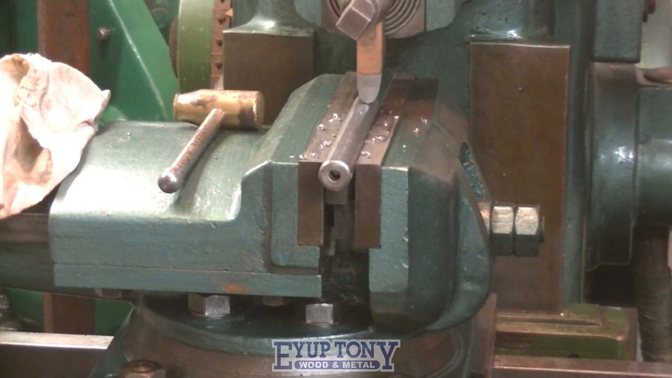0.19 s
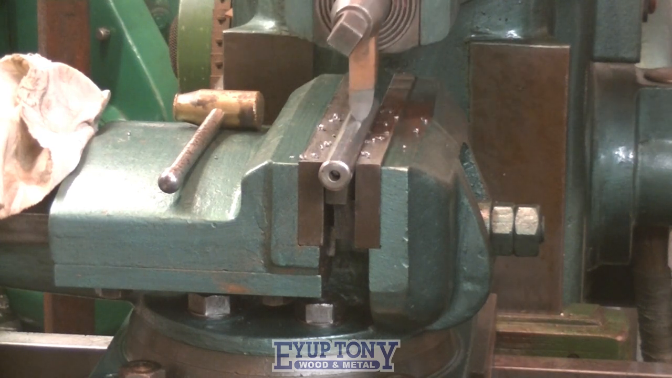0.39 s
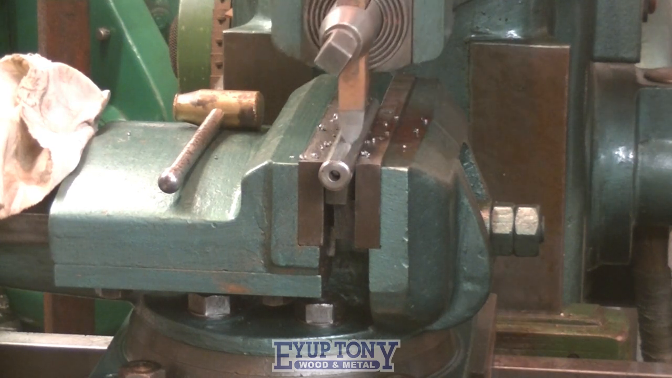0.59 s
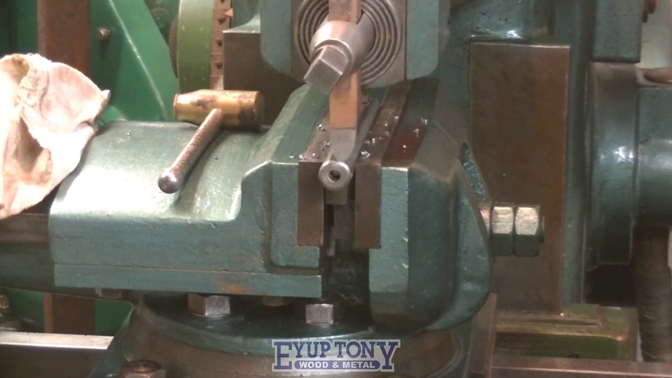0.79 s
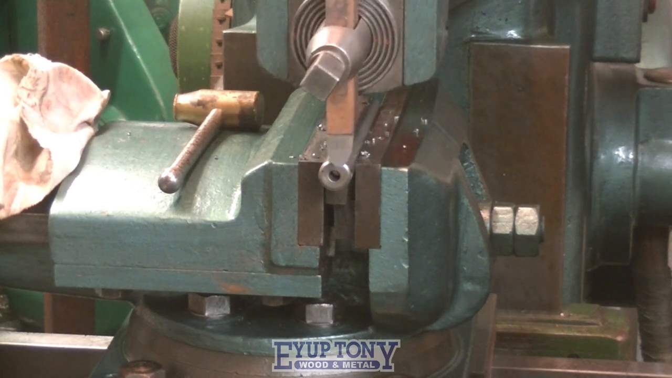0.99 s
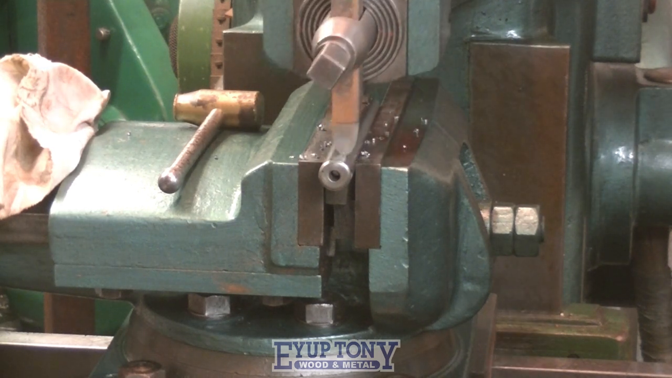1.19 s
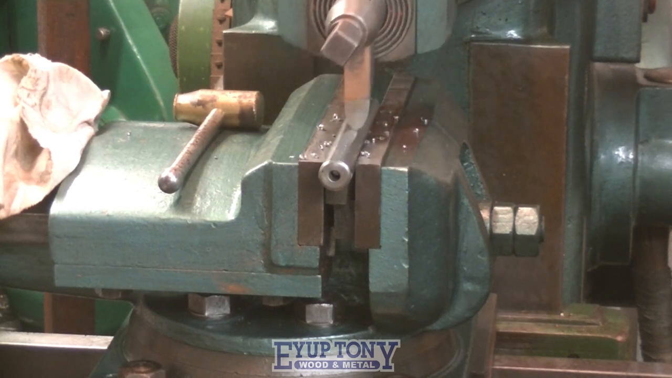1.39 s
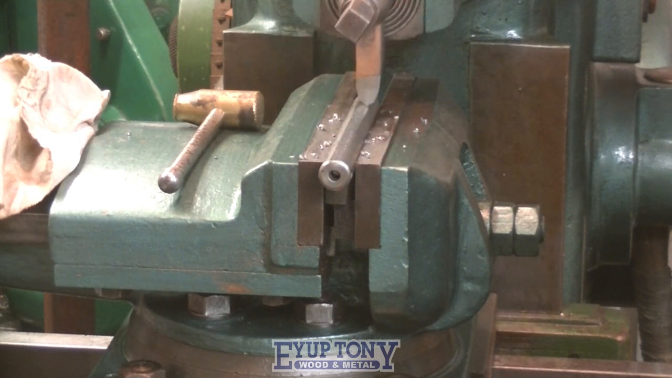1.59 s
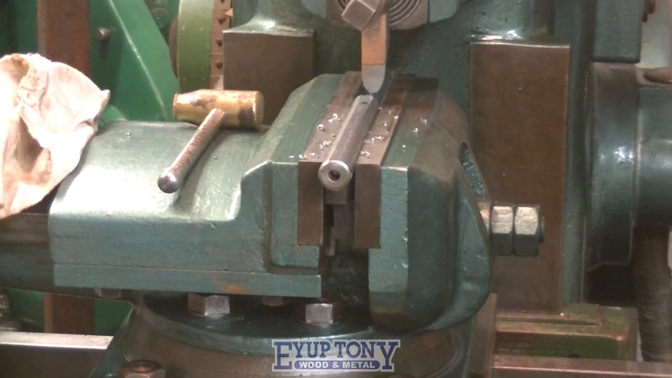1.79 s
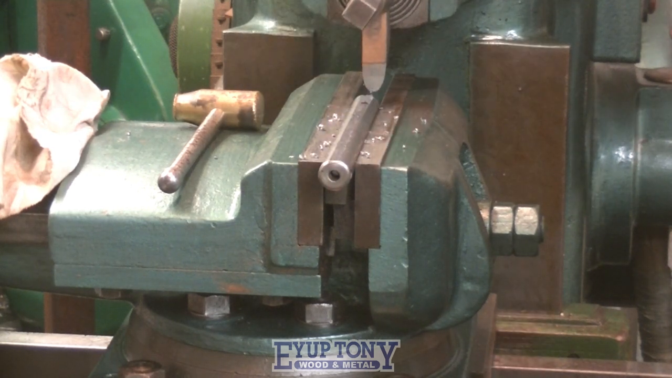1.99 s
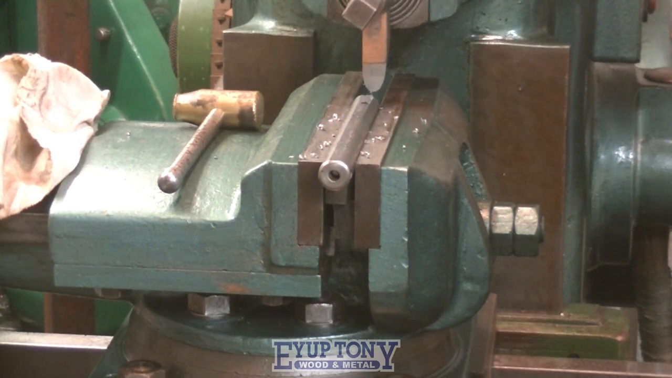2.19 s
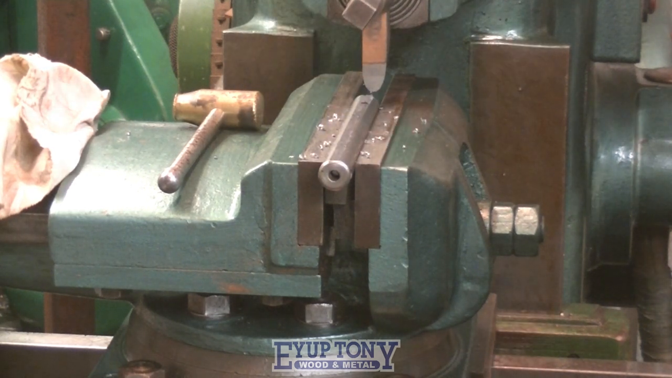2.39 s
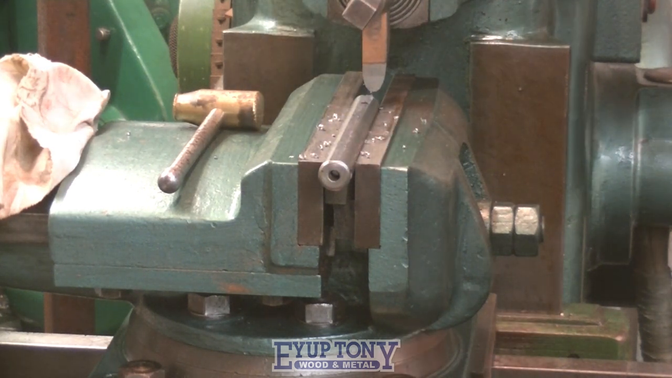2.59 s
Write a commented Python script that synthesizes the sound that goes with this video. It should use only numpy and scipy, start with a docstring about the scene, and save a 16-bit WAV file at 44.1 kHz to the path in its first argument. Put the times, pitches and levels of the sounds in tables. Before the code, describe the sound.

Metal shaping machine in a workshop, heard close: low motor hum and gear whine, a rough ringing scrape of sliding steel, a bright snapping click, soft knocks at the end, then only whir.

```python
"""Metal shaper, one stroke

The drive hums, whines and whirs: sines plus coloured noise that throbs at the hum rate.
As the ram travels out and back, dense random slips ring the iron frame in a coarse scrape;
narrow noise bands add a low rumble, a thin steel sizzle and a rubbing steel tone.
One sharp click falls in mid stroke: noise cracks, clatter, decaying modes, an echo and a tail.
Decaying bursts (knocks) and swelling noise bands (scuffs) come as the ram slows."""
import sys
import numpy as np
from scipy import signal
from scipy.fft import rfft, irfft
from scipy.io import wavfile

SR = 44100
rng = np.random.default_rng(int(sys.argv[2]) if len(sys.argv) > 2 else 0)


def unload_audio(sound):
    """Save the sound as a 16-bit wav file, at the path given as the first command line argument."""
    columns = np.transpose(np.atleast_2d(sound))
    # keep every value between -1 and 1, then stretch to whole-number steps
    steps = np.round(np.clip(columns, -1, 1) * 32767)
    wavfile.write(sys.argv[1], SR, steps.astype(np.int16))


N = 116865
T = np.arange(N) / SR
HZ = np.fft.rfftfreq(N, 1 / SR)

# Stereo likeness: (frequency [Hz], left-right correlation [-1..1])
STEREO_LIKENESS = [(30, .4), (120, 0.34), (300, 0.98), (1000, .95), (2000, 0.93), (4000, 0.64),
                   (8000, 0.41), (15000, 0.31)]
# Stereo balance: (frequency [Hz], left minus right [dB])
STEREO_BALANCE = [(30, 2), (60, 0), (99, 5), (160, -0.5), (270, 2.5), (450, 3), (740, 3.5), (1220, 2.0),
                  (2010, 2.0), (3330, -0.5), (5500, 1.5), (8300, 4), (11000, -0.5), (15000, -1)]

# Drive whir: (time [s], level [dB])
WHIR_LEVEL = [(0, -52.5), (.2, -54), (1, -52), (2.05, -53.5), (2.13, -52.5), (2.2, -54), (2.38, -54),
              (2.5, -55.5), (2.65, -57.5)]
# Whir spectrum: (frequency [Hz], density [dB per Hz, relative])
WHIR_SPECTRUM = [(25, -42), (60, -38), (130, -30.5), (180, -20), (240, -26), (310, -12.5), (390, -8.5),
                 (500, -7.5), (750, -11), (1100, -6), (1450, -13.5), (2400, -13), (3350, -21.5),
                 (4300, -26.5), (4900, -29), (7200, -33), (9000, -37.5), (10300, -44), (12500, -41.5),
                 (13800, -58), (15500, -64)]
# Gear housing ringing: (frequency [Hz], width [Hz], level [dB, relative])
HOUSING_MODES = [(378, 30, -0.5), (1146, 46, -1.5), (1778, 67, -3), (2138, 53, -6.5), (2370, 37, -3.5),
                 (2960, 34, -5), (3773, 40, -14.5), (4060, 40, -11), (4290, 56, -12), (7170, 100, -26),
                 (8350, 100, -19)]
# Hum and gear whine: (multiple of HUM_HZ, level [dB])
HUM_ORDERS = [(1, -91.5), (3, -82), (4, -80), (5, -67.5), (6, -69), (7, -72), (8, -77), (10, -73.5),
              (11, -72.5), (16, -78)]
# Whine of the meshing gears: (time [s], level [dB])
MESH_LEVEL = [(0, -63), (.2, -62), (1, -76), (2.05, -60), (2.25, -59), (2.4, -60.5), (2.5, -66),
              (2.65, -77)]
HUM_HZ, MESH_HZ = 99.9, 899

# Scrape of the stroke: (time [s], body and ring level [dB], treble level [dB])
SCRAPE_LEVEL = [(.22, -44.5, -78), (.25, -43.5, -55.5), (.286, -37, -46), (.33, -40, -44.5),
                (.39, -41.5, -46), (.45, -42, -48), (.52, -41, -46), (.65, -41.5, -48), (.75, -43.5, -51.5),
                (.82, -43.5, -50.5), (.89, -40.5, -47), (.94, -43, -51), (.995, -46, -55.5),
                (1.07, -44.5, -51.5), (1.18, -42.5, -50), (1.33, -41, -47.5), (1.49, -40.5, -46),
                (1.6, -41, -46.5), (1.76, -41, -47), (1.79, -39, -43.5), (1.84, -42.5, -48),
                (1.88, -44, -48), (1.905, -37, -48), (1.917, -44.5, -52), (1.96, -46, -52),
                (2.03, -47, -65), (2.1, -45.5, -54)]
# Scrape spectrum: (frequency [Hz], density [dB per Hz, relative])
SCRAPE_SPECTRUM = [(35, -77), (60, -68), (123, -51), (160, -27.5), (205, -25.5), (257, -13.5), (309, -11.5),
                   (381, -4), (564, -3), (663, -1), (780, 0), (1270, 0), (1360, -3.5), (1880, -7),
                   (2530, -10.5), (5950, -43), (7160, -37), (7860, -41), (15000, -68)]
# Low ringing of frame and vise: (frequency [Hz], width [Hz], level [dB, relative])
FRAME_MODES = [(350.8, 7.7, -0.5), (387.8, 17, 1.5), (648, 6.6, 4), (690.4, 5.7, 7), (756.2, 10.6, 3.5),
               (807, 7.9, 1.5), (892, 4.3, 4), (942, 18, 0), (1096, 11, -2), (1184.6, 8.5, 3.5),
               (1290.5, 4.2, 2)]
# High ringing of tool post and slide: (frequency [Hz], width [Hz], level [dB, relative])
SLIDE_MODES = [(1417, 17, 4.5), (1647, 6.7, -4.5), (1728, 13, -4), (1785, 15, -5.5), (1834, 17, -1.5),
               (1935, 26, 0), (2207, 7.6, -6), (2602, 21, -4.5), (2869, 23, -8), (3356, 9.4, -16.5),
               (4050, 23, -41), (4480, 11, -24.5), (5170, 90, -18)]
SLIPS_PER_S, SLIP_SPREAD_DB, SPLIT_HZ = 3800, 1.44, 1310
BODY_DB, RING_DB, TREBLE_DB = -4.5, -6.5, -1.5  # relative to SCRAPE_LEVEL
SLIDE_DB = -4  # relative to the plain treble

# Sizzle of sliding steel: (time [s], level [dB])
SIZZLE_LEVEL = [(.22, -88), (.275, -74), (.36, -73), (.39, -66), (.42, -73), (.46, -84), (.57, -71),
                (.62, -73), (.72, -92), (1.33, -95), (1.39, -71), (1.47, -75), (1.6, -69.5), (1.67, -76),
                (1.7, -71), (1.718, -60), (1.738, -72), (1.762, -64), (1.79, -72), (1.83, -94)]
SIZZLE_HZ, SIZZLE_WIDTH_HZ = 7150, 350
# Low rumble of the travelling ram: (time [s], level [dB])
RUMBLE_LEVEL = [(.25, -85), (.33, -69.5), (.53, -70.5), (.65, -80), (1.25, -76), (1.45, -72), (1.58, -63),
                (1.72, -75), (1.9, -85)]
RUMBLE_HZ, RUMBLE_WIDTH_HZ = 251.4, 55

# Click spectrum: (frequency [Hz], density [dB per Hz, relative])
CLICK_SPECTRUM = [(30, -4), (80, -21), (200, -13), (800, -11), (2000, 0), (2800, 6.5), (4300, -1.5),
                  (5500, -3.5), (6300, -3.5), (7100, 1), (7800, -1), (8600, 0), (9400, -8), (10300, -18),
                  (11500, -13), (14500, -16), (16000, -20)]
# Decay of the click's tail: (frequency [Hz], T60 [s])
CLICK_T60_S = [(500, 0.17), (3000, 0.19), (6000, 0.22), (9000, .16), (15000, 0.17)]
# Modes of the clicking steel part: (frequency [Hz], level [dB, relative], T60 [s])
PAWL_MODES = [(2670, 0, .2), (3380, -5, .2), (3880, 6, .2), (5330, 8, 0.21), (5938, 4, 0.19),
              (6966, 4, .14), (7472, -10, .15), (8500, -7, .12)]
# Strike and rebounds of that part: (time [s], level [dB re CLICK_DB])
CLICK_STRIKES = [(1.192, 13), (1.1946, 8), (1.1982, 5)]
CLICK_S, CLICK_DB = 1.1926, -41.5

# Ringing of the sliding ram: (time [s], level [dB])
SING_LEVEL = [(1.2, -74), (1.4, -56), (1.7, -63), (2.0, -80), (2.11, -69), (2.19, -65), (2.235, -57),
              (2.28, -70), (2.38, -63), (2.5, -71), (2.65, -76)]
SING_HZ, SING_WIDTH_HZ = 2571, 48
# Light scuffs: (start [s], length [s], level [dB], centre [Hz], width [Hz])
SCUFF_EVENTS = [(1.7, 0.13, -72, 8100, 2000), (1.71, 0.098, -75.5, 12600, 2600),
                (1.711, 0.09, -61.5, 5500, 2600), (1.805, 0.085, -57, 4200, 1500),
                (1.824, 0.049, -48.5, 2500, 700), (1.92, 0.067, -45, 684, 70),
                (2.14, 0.023, -60.5, 2800, 700), (2.1, 0.083, -56, 1650, 648.1)]
# Knocks of slack taken up: (time [s], dull thud [dB], bright clink [dB])
KNOCK_EVENTS = [(1.805, -42, -68), (1.822, -43, -54), (1.831, -60, -51), (1.891, -43, -62)]
# Clink spectrum: (frequency [Hz], density [dB per Hz, relative])
CLINK_SPECTRUM = [(500, -25), (1800, -4), (2700, 4), (3400, 1), (4400, 1), (5100, -6), (6000, -17),
                  (7200, -19), (8100, -12), (9500, -30), (15000, -48)]
EDGE_HZ = 16000


def amp(db):
    """Decibels to gain."""
    return 10 ** (np.asarray(db) / 20)


def unit(x):
    """Scales to rms 1."""
    return x / np.sqrt(np.mean(x ** 2) + 1e-20)


def read(points, hz):
    """Interpolates a frequency table on a log axis."""
    f, value = np.transpose(points)
    return np.interp(np.log(hz + 1), np.log(f + 1), value)


def level(points, column=1):
    """Interpolates a dB curve over time and returns gain."""
    rows = np.array(points)
    return amp(np.interp(T, rows[:, 0], rows[:, column]))


def shape(x, gain):
    """Filters by a gain per frequency."""
    return irfft(rfft(x) * gain, N)


def drift(hz):
    """Random fluctuation low-passed at hz, zero mean, rms 1."""
    return unit(shape(rng.standard_normal(N), (HZ > 0) / (1 + (HZ / hz) ** 4)))


def ports(x):
    """Mixes two unrelated signals to the stereo correlation and balance per frequency."""
    same = np.clip(read(STEREO_LIKENESS, HZ), -1, 1)
    mid = shape(x[0], np.sqrt((1 + same) / 2))
    side = shape(x[1], np.sqrt((1 - same) / 2))
    balance_db = np.outer([.5, -.5], read(STEREO_BALANCE, HZ))
    return shape(np.array([mid + side, mid - side]), amp(balance_db))


def noise():
    """Stereo noise from two white sources."""
    return ports(rng.standard_normal((2, N)))


def grit(per_s, spread_db):
    """Stereo stream of random-sign impulses of uneven size: tiny slips, rms 1."""
    size = amp(spread_db * np.minimum(rng.exponential(1, (2, N)), 4))
    sign = rng.choice([-1, 1], (2, N))
    present = rng.random((2, N)) < per_s / SR
    return unit(ports(size * sign * present))


def resonances(modes):
    """Summed response of damped modes, each scaled by its width to set its total level."""
    return sum(
        amp(db) / np.sqrt(width) / (1 + 1j * (HZ ** 2 - f ** 2) / (width * HZ + 1e-6))
        for f, width, db in modes)


def band(hz, width_hz):
    """Noise in one steep-sided resonance, gain 1/8 at width_hz off centre, rms 1."""
    return unit(shape(noise(), 1 / (1 + ((HZ - hz) / width_hz) ** 2) ** 3))


def burst(start_s, decay_s):
    """Envelope of a blow: 0.34 ms rise and exponential fall."""
    return np.clip((T - start_s) / 0.00034, 0, 1) * np.exp(-np.maximum(T - start_s, 0) / decay_s)


def drive(housing_db=-8, whir_db=-4.5, throb=0.13, waver=0.00054, flutter_db=1.6):
    """Motor hum and gear whine as wavering sines; whir as noise throbbing at the hum rate."""
    phase_per_hz = 2 * np.pi * np.cumsum(1 + waver * drift(3.8)) / SR
    whir_spectrum_db = read(WHIR_SPECTRUM, HZ)
    air = amp(whir_db) * unit(shape(noise(), amp(whir_spectrum_db)))
    ceiling = np.minimum(amp(whir_spectrum_db + 28.5), 1)  # trims ringing where the whir is weak
    housing = amp(housing_db) * unit(shape(noise(), resonances(HOUSING_MODES) * ceiling))
    whir = (air + housing) * level(WHIR_LEVEL) * (1 + throb * np.cos(HUM_HZ * phase_per_hz))

    hum = 0
    for multiple, db in HUM_ORDERS:
        gain = amp(db + flutter_db * drift(8.5))
        hum = hum + gain * np.sin(multiple * HUM_HZ * phase_per_hz + 2 * np.pi * rng.random())
    whine = level(MESH_LEVEL) * amp(flutter_db * drift(6.6)) * np.sin(MESH_HZ * phase_per_hz)
    # sqrt(2): sine levels are rms; tones lean left
    return whir + np.sqrt(2) * (hum + whine) * amp([[1.2], [-1.2]])


def scrape(rattle_db=0.73):
    """Tiny uneven slips shake the machine and ring frame and slide while the ram moves."""
    slips = grit(SLIPS_PER_S, SLIP_SPREAD_DB) * amp(rattle_db * drift(160))
    colour = amp(read(SCRAPE_SPECTRUM, HZ))
    low = 1 / (1 + (HZ / SPLIT_HZ) ** 8)
    high = 1 - low
    body = amp(BODY_DB) * unit(shape(slips, colour * low))
    # ringing is trimmed where the scrape spectrum falls below a threshold
    frame_gain = resonances(FRAME_MODES) * np.minimum(colour / amp(-4.5), 1)
    ring = amp(RING_DB) * unit(shape(slips, frame_gain))
    slide_gain = resonances(SLIDE_MODES) * high * np.minimum(colour / amp(-33.5), 1)
    slide = amp(SLIDE_DB) * unit(shape(slips, slide_gain))
    treble = amp(TREBLE_DB) * (unit(shape(slips, colour * high)) + slide)
    moving = np.interp(T, [.21, .24, 1.99, 2.12], [0, 1, 1, 0])
    return moving * ((body + ring) * level(SCRAPE_LEVEL) + treble * level(SCRAPE_LEVEL, column=2))


def sizzle(flutter_db=3):
    """A high steel resonance, as narrow noise, catches in fits."""
    return band(SIZZLE_HZ, SIZZLE_WIDTH_HZ) * level(SIZZLE_LEVEL) * unit(amp(flutter_db * drift(46)))


def rumble():
    """The heavy ram rumbles on its ways: a low noise band."""
    return band(RUMBLE_HZ, RUMBLE_WIDTH_HZ) * level(RUMBLE_LEVEL)


def click(crack_s=0.00042, clatter_db=-4, clatter_s=0.015, ring_db=-17, rise_s=0.00033,
          echo_db=-8, echo_s=0.036, echo_length_s=.012, echo_top_hz=7000):
    """Steel snaps and rebounds: cracks, clatter, modes, dull near reflections, room tail."""
    age_s = np.maximum(T - CLICK_S, 0)
    colour = amp(read(CLICK_SPECTRUM, HZ))
    # tail: gritty noise, each frequency bin decaying at its own T60
    hz, t, bins = signal.stft(unit(shape(grit(3000, 1), colour)), SR, nperseg=256)
    decay_db = -60 * np.maximum(t - CLICK_S, 0) / read(CLICK_T60_S, hz)[:, None]
    tail = signal.istft(bins * amp(decay_db), SR, nperseg=256)[1][:, :N]

    blows = sum(amp(db) * burst(s, crack_s) for s, db in CLICK_STRIKES)
    blows = blows + amp(clatter_db) * burst(CLICK_S, clatter_s)
    crack = unit(shape(noise(), colour * np.sqrt(HZ))) * blows

    echo_noise = unit(shape(grit(2000, 1), colour / (1 + (HZ / echo_top_hz) ** 4)))
    echo = echo_noise * amp(echo_db) * np.exp(-((age_s - echo_s) / echo_length_s) ** 2)

    ring = sum(
        amp(db - 60 * age_s / t60_s) * np.sin(2 * np.pi * (f * age_s + rng.random((2, 1))))
        for f, db, t60_s in PAWL_MODES)
    onset = np.minimum(age_s / rise_s, 1)
    return amp(CLICK_DB) * (crack + onset * (tail + echo + amp(ring_db) * ring))


def sing():
    """A narrow steel resonance of the sliding ram, rubbed into sound: a noise band."""
    return band(SING_HZ, SING_WIDTH_HZ) * level(SING_LEVEL)


def scuffs(ragged_db=3):
    """Short rubs: noise bands that swell and fade with a ragged level."""
    rubs = 0
    for start_s, length_s, db, hz, width_hz in SCUFF_EVENTS:
        progress = np.clip((T - start_s) / length_s, 0, 1)
        swell = np.sin(np.pi * progress ** 0.65)  # peaks before halfway
        rubs = rubs + amp(db) * band(hz, width_hz) * swell
    return rubs * unit(amp(ragged_db * drift(240)))


def knocks(thud_s=0.013, clink_s=0.017, thud_top_hz=1300, rise_s=0.0036):
    """Loose parts crunch as the ram brakes: a soft thud in the frame, a gritty steel clink."""
    thud_colour = amp(read(SCRAPE_SPECTRUM, HZ)) / (1 + (HZ / thud_top_hz) ** 4)
    clink_colour = amp(read(CLINK_SPECTRUM, HZ))
    thud, clink = 0, 0
    for start_s, thud_db, clink_db in KNOCK_EVENTS:
        onset = np.clip((T - start_s) / rise_s, 0, 1)
        thud = thud + amp(thud_db) * burst(start_s, thud_s) * onset
        clink = clink + amp(clink_db) * burst(start_s, clink_s) * onset
    thud_sound = shape(noise() * thud, unit(thud_colour))
    return thud_sound + shape(grit(6000, 1) * clink, unit(clink_colour))


def scene():
    """Sums all sources of the machine."""
    return drive() + scrape() + sizzle() + rumble() + click() + sing() + scuffs() + knocks()


def record(dry):
    """The recorder's band limit: linear-phase low-pass at EDGE_HZ."""
    lowpass = signal.firwin(401, EDGE_HZ, window=("kaiser", 8), fs=SR)
    return signal.oaconvolve(dry, lowpass[None], "same")


dry = scene()
out = record(dry)
unload_audio(out)
```